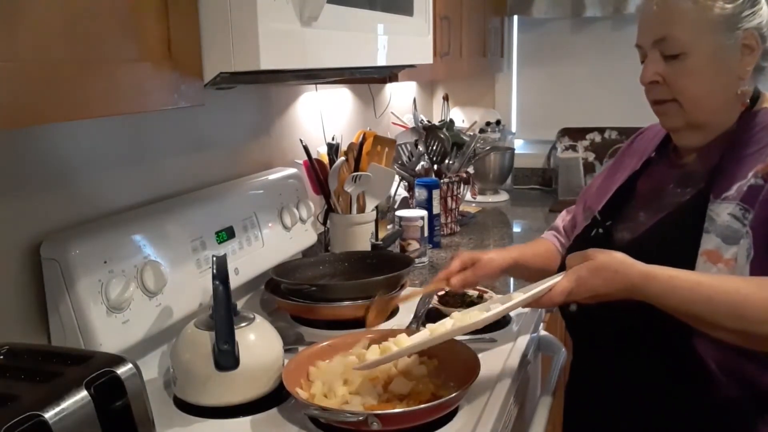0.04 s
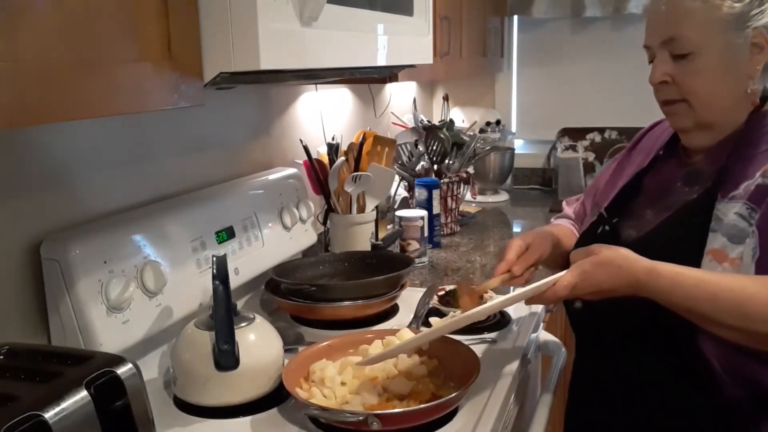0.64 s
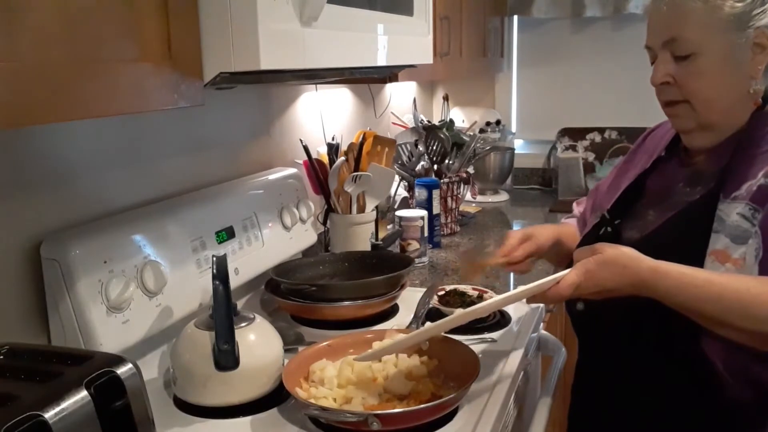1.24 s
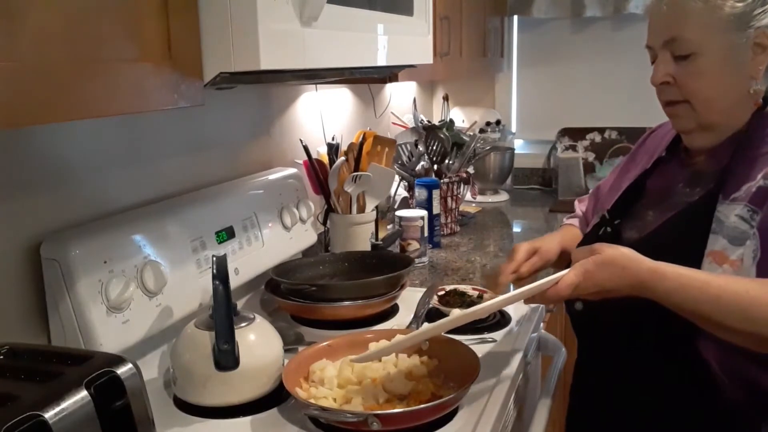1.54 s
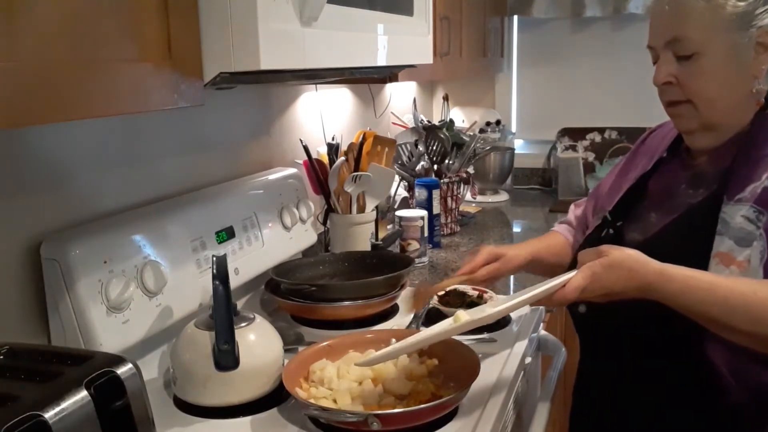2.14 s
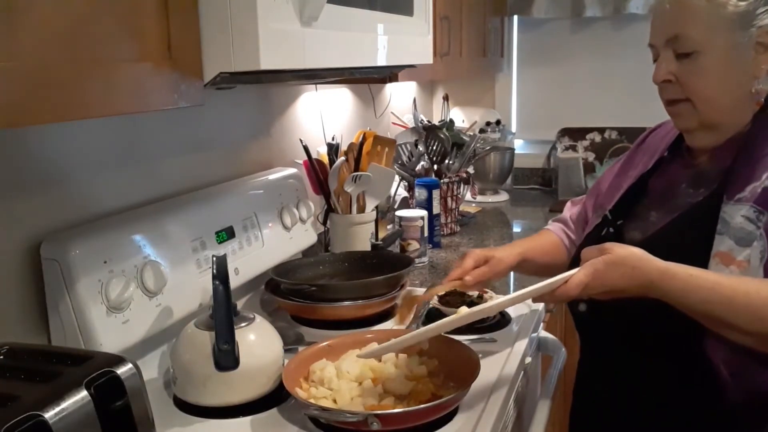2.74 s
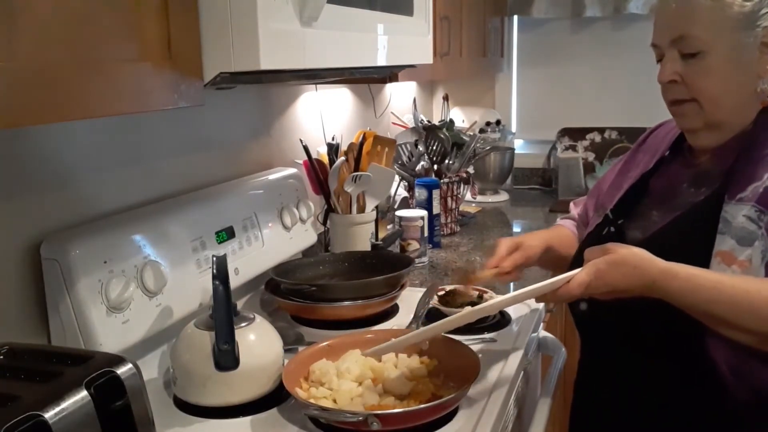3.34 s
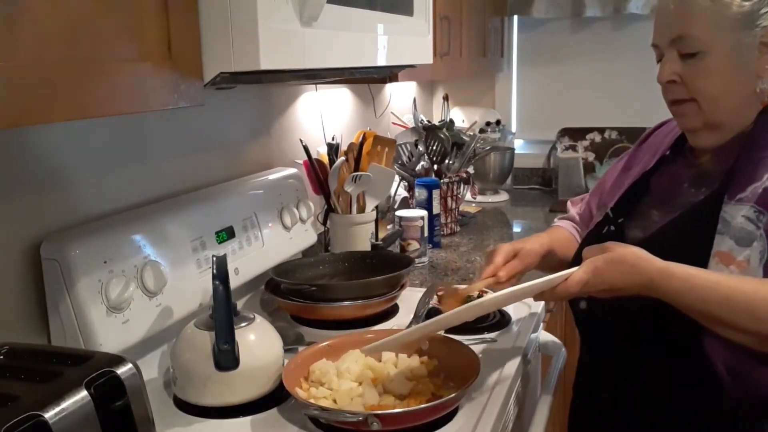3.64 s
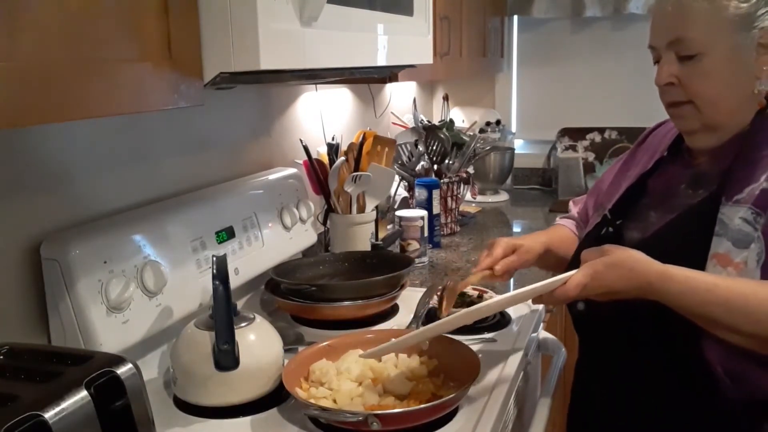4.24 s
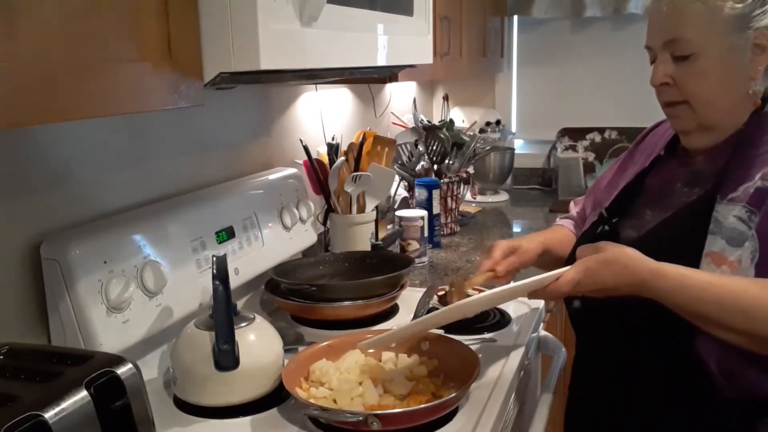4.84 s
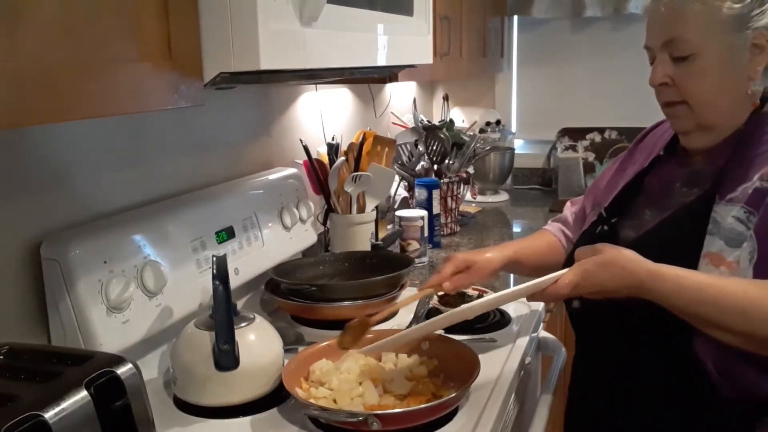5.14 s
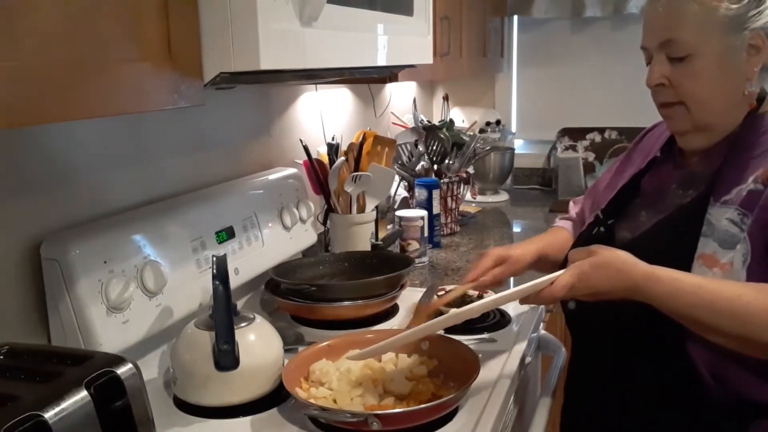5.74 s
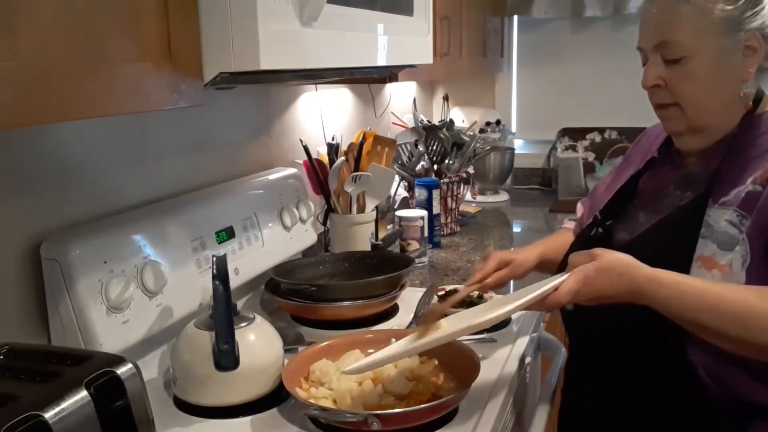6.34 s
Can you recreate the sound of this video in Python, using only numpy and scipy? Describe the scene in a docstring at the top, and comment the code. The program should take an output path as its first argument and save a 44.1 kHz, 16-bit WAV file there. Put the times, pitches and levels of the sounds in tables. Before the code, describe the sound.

Potatoes sizzle and crackle in a frying pan while a wooden spatula repeatedly knocks and scrapes on a cutting board.

```python
"""A steady, crackling sizzle: potatoes and vegetables fry in oil in a pan on a kitchen stove.
Water bursts from the food in tiny bubbles and the pan rings faintly, with sharp pops of oil and one
bright clack. A wooden spatula knocks on a cutting board held over the pan and scrapes food off it by
stick-slip friction; the first batch makes the oil surge. Oil and board reflect off a hard surface
3 ms later and reverberate in the small room. An appliance hums underneath."""
import sys
import numpy as np
from scipy import signal
from scipy.fft import rfft, irfft
from scipy.io import wavfile

SR = 44100
rng = np.random.default_rng(int(sys.argv[2]) if len(sys.argv) > 2 else 0)


def to_wav(s):
    """Save 16-bit WAV."""
    ch = np.atleast_2d(s).T  # columns
    pcm = np.round(np.clip(ch, -1, 1) * 32767)  # PCM
    wavfile.write(sys.argv[1], SR, pcm.astype(np.int16))


N = 291192
TIME = np.arange(N) / SR

# spectra of the oil's fine fizz and coarser spatter: (frequency [Hz], relative level [dB])
FIZZ_SPECTRUM = [(7500, -25.5), (8500, -19.5), (9400, -2), (10800, -1.5), (11900, 1), (13200, -4),
                 (15800, -8)]
SPATTER_SPECTRUM = [(250, -18), (500, -9), (700, -7.5), (1100, -6), (1500, -6), (1900, -4.5), (2600, -3.5),
                    (4700, 2), (6400, -1), (8400, 2.5), (9800, 4), (16000, -35)]
# sharp pops of oil and one bright clack: (time [s], source level [dB], spatter relative to fizz [dB])
POPS_AND_CLACK = [(0.5507, -25.5, -12), (2.887, -27, -14), (3.1185, -29.5, -16), (3.175, -27, -1),
                  (4.3303, -25, -10), (4.4504, -21, -2.5), (5.0391, -24.5, -7), (6.2903, -22, 8),
                  (6.414, -25.5, -12)]
# fat bubbles that ring the pan: (time [s], level [dB])
FAT_BUBBLES = [(2.251, -39), (3.803, -36), (5.155, -31.5), (6.228, -35)]
# spatula landings: (time [s], drive level [dB], contact cutoff [Hz], thump relative to drive [dB])
SPATULA_KNOCKS = [(.7646, -27, 950, -23), (1.426, -11.5, 1200, -17.5), (1.4712, -19.5, 1140, -17),
                  (1.626, -20, 960, -9.5), (1.9351, -25.5, 1350, -29), (2.3494, -5.5, 1300, -17),
                  (2.6033, -14.5, 1540, -27), (2.8479, -9.5, 1670, -22), (3.5113, -14, 1850, -19.5),
                  (4.3464, -12, 2130, -22), (4.8594, -8, 3720, -21), (5.5363, -10.5, 1560, -17),
                  (5.7131, -19.5, 1130, -12.5), (5.8111, -15.5, 1600, -23), (6.2545, -8.5, 1050, -20),
                  (6.3268, -23, 1250, -34), (6.3797, -18.3, 1360, -21)]
# spatula strokes along the board: (start [s], end [s], level [dB], friction cutoff [Hz])
SPATULA_STROKES = [(0.791, 0.87, -47.5, 1200), (1.486, 1.596, -39, 850), (1.647, 1.796, -45.5, 450),
                   (1.8, 1.888, -43, 1000), (2.46, 2.564, -38.5, 770), (2.875, 2.969, -39, 1200),
                   (3.562, 3.714, -38, 960), (4.385, 4.433, -41.5, 1100), (4.927, 5.061, -36, 1300),
                   (5.554, 5.676, -36.5, 1110), (5.686, 5.824, -35.5, 1270), (6.354, 6.406, -37.5, 1480)]
# spectra of the board's dead thud and of its low flexing thump: (frequency [Hz], relative level [dB])
THUD_SPECTRUM = [(90, -18), (170, -19), (270, -11), (380, -10), (620, 6.5), (850, 1), (1300, -0.5),
                 (2200, 1), (3500, -3.5), (6000, -26), (12000, -44)]
FLEX_SPECTRUM = [(60, -21), (130, -12), (180, -4.5), (290, 3), (400, 0), (900, -28.5), (4000, -83)]
# normal modes of the board: (frequency [Hz], relative level [dB], t60 [s])
BOARD_MODES = [(193, -36, 0.48), (270.4, -35.5, .35), (443.6, -24.5, 0.28), (594, -21.5, 0.11),
               (661, -25.5, 0.26), (693, -12.5, 0.064), (772, -29.5, 0.47), (761, -22, 0.16),
               (860, -16.5, 0.045), (989, -22.5, 0.28), (1060, -69, 0.1), (1109, -17.5, 0.11),
               (1205, -18, 0.14), (1362, -18.5, 0.13), (1360, -53, .13), (1663, -14.5, 0.053),
               (2240, -26, 0.25)]
# the board's direct sound and early reflections: (delay [s], left gain [ratio], right gain [ratio])
BOARD_PATHS = [(0, 0.63, 0.66), (.0031, 2, 1), (.0059, 0.27, 0.76), (.0098, -0.34, -0.2),
               (0.0109, 0.9, -0.38), (0.0169, 0.76, 0.46)]
# reverberation time of the kitchen: (frequency [Hz], t60 [s])
ROOM_DECAY = [(200, 0.24), (600, 0.24), (1500, 0.26), (4000, 0.19), (14000, 0.047)]
# partials of the motor hum: (frequency [Hz], level [dB])
HUM_PARTIALS = [(89.3, -63.5), (179, -65.5), (248, -60)]
# spectrum of the kitchen's rumble: (frequency [Hz], relative level [dB])
RUMBLE_SPECTRUM = [(20, -42), (33, -28), (45, 6), (60, 3), (75, -7), (140, 2), (270, 1.5), (380, -4),
                   (700, -4.5), (1500, -10), (4000, -43)]
# growth of hum, drone and rumble: (time [s], gain [dB])
BACKGROUND_RISE = [(0, -6), (1.2, -2), (2.2, -2.6), (5.5, 0)]

FIZZ_DB, SPATTER_DB = -33.5, -37.5  # before the surge
FOOD_S, SURGE_S, SURGE_DB, SETTLE_S = 0.77, 0.23, 2.5, 4.5  # onset, rise time, height, decay constant
SPATTER_SURGE_SHARE, FIZZ_WIDTH = .85, .42
PAN_HZ, PAN_UPPER_HZ, PAN_T60 = 2154, 2410, .06
GRIP_S, BRIGHTEN_DB = .018, 5  # a stroke's fade at each end, and its rise in treble
DRONE_HZ, DRONE_DB, WAVER_DEPTH, WAVER_HZ = 59.8, -61.5, 0.97, 1.9
ECHO_S = .0031  # reflection from the hard surface


def sizzle(patches=7):
    """Shot noise: water bursts in flurries of bubbles, each patch of pan with its own pitch and echo."""
    fizz, spatter = np.zeros((2, 2, N))
    flurry_db = .25 * drift(hz=22)
    pitches = np.geomspace(2500, 14500, patches)
    for hz, place in zip(pitches, rng.permutation(np.linspace(-1, 1, patches))):
        bubbles = signal.lfilter(*signal.iirpeak(hz, 2, SR), crackle(per_s=1500, spread_db=3.5, cap=6.2))
        snaps = crackle(per_s=380, spread_db=3.2, cap=5)  # the sharpest bursts cover all pitches
        bursts = (0.8 * unit_rms(bubbles) + unit_rms(snaps)) * gain_of(flurry_db + 1.54 * drift(hz=34.4))
        add(bursts, ECHO_S + .0005 * place, 0.48 * bursts)
        fizz += oil_path(bursts, FIZZ_SPECTRUM, wet=.7, width=FIZZ_WIDTH)
        spatter += oil_path(bursts, SPATTER_SPECTRUM, wet=1.09, width=1.124)
    fizz = unit_rms(fizz) * gain_of(FIZZ_DB + surge())
    spatter = unit_rms(spatter) * gain_of(SPATTER_DB + SPATTER_SURGE_SHARE * surge())
    return fizz * leftward(db=-1.0) + spatter * leftward(db=2.5)


def surge():
    """Exponential relaxation: fresh food quickly lifts the oil's level, in dB, which then settles."""
    age = np.maximum(TIME - FOOD_S, 0)
    return SURGE_DB * np.minimum(age / SURGE_S, 1) * np.exp(-np.maximum(age - SURGE_S, 0) / SETTLE_S)


def pops_and_clack():
    """Transients: sharp pops of oil and one bright clack, each a fast-decaying noise reflected once."""
    fine, coarse = np.zeros((2, N))
    t = TIME[:2048]
    onset = round(.005 * SR)  # the first 5 ms set the level
    for s, level_db, spatter_db in POPS_AND_CLACK:
        snap, body = rng.standard_normal((2, len(t)))
        snap = signal.lfilter(*signal.butter(2, 13500, fs=SR), snap)
        snap *= np.exp(-t / 0.00083) + 0.057 * np.exp(-t / 0.0053)
        body *= np.exp(-t / .0005) + .15 * np.exp(-t / .012)
        size = gain_of(level_db) / np.hypot(1, gain_of(spatter_db))
        for delay, gain in (0, .8), (ECHO_S, .65):
            add(fine, s + delay, gain * size * snap / snap[:onset].std())
            add(coarse, s + delay, gain * size * gain_of(spatter_db) * body / body[:onset].std())
    fizz = oil_path(fine, FIZZ_SPECTRUM, wet=1.0, width=FIZZ_WIDTH)
    return fizz + oil_path(coarse, SPATTER_SPECTRUM, wet=0.77, width=1)


def oil_path(bursts, spectrum, wet, width):
    """Linear filtering by the oil's spectrum and the room; width scales the stereo difference."""
    path = wet * room(delay=0.0022)
    path[:, 0] += 1  # direct sound
    mid = path.mean(0)
    path = convolve(mid + width * (path - mid), pulse(spectrum))
    return convolve(bursts, path / np.linalg.norm(path.mean(0)))


def pan_ring():
    """Resonance: small bubbles excite two modes of the pan; fat ones strike the lower mode alone."""
    t = TIME[:8000]
    lower = mode(PAN_HZ, PAN_T60, t)
    upper = mode(PAN_UPPER_HZ, PAN_T60, t)
    damped = (lower + 0.6 * upper) * np.exp(-t / 0.059)  # food lying on the metal damps it
    bubbles = crackle(per_s=700, spread_db=3.5, cap=1.7) * gain_of(2.0 * surge())
    ringing = gain_of(-54.0) * unit_rms(convolve(bubbles, damped))
    for s, level_db in FAT_BUBBLES:
        add(ringing, s, gain_of(level_db) * lower)
    return (ringing + 0.17 * convolve(ringing, room(delay=0.0093))) * leftward(db=3.5)


def knocks():
    """Impact: the spatula pushes, rebounds and flexes the board; softer contact gives a duller knock."""
    blows, flex = np.zeros((2, N))
    jitters = rng.uniform(-0.79, 1, len(SPATULA_KNOCKS))
    for (s, drive_db, cutoff_hz, thump_db), jitter in zip(SPATULA_KNOCKS, jitters):
        contact = signal.lfilter(*signal.butter(2, cutoff_hz, fs=SR), signal.unit_impulse(512))
        push = gain_of(drive_db) * contact
        add(blows, s, push)
        add(blows, s + 0.00037 + 0.0003 * jitter, -.45 * push)  # the blade springs off
        add(flex, s + ECHO_S, gain_of(drive_db + thump_db) * pulse(FLEX_SPECTRUM))
    clack = board(blows, ring_db=-4.5, wet=.75)
    thump = flex + 0.49 * convolve(flex, room(delay=0.0035)[0])
    return clack + thump * leftward(db=2.5)


def scrapes():
    """Stick-slip friction: wood on the board gives a run of tiny blows, brightening along each stroke."""
    slips = crackle(per_s=1500, spread_db=1.6, cap=3) * gain_of(1.4 * drift(hz=90))
    blows = np.zeros(N)
    for start, end, level_db, cutoff_hz in SPATULA_STROKES:
        t = TIME[:round((end - start) * SR)]
        rub = signal.lfilter(*signal.butter(2, cutoff_hz, fs=SR), slips[round(start * SR):][:len(t)])
        low = signal.lfilter(*signal.butter(1, cutoff_hz, fs=SR), rub)
        contact = np.minimum(np.minimum(t, t[-1] - t) / GRIP_S, 1)
        treble_gain = gain_of(BRIGHTEN_DB * t / t[-1])
        add(blows, start, gain_of(level_db) * unit_rms(contact * (low + treble_gain * (rub - low))))
    return unit_rms(board(blows, ring_db=-2.5, wet=0.94)) * blows.std()


def board(blows, ring_db, wet):
    """Impulse response: each blow gives ringing modes and a thud that near surfaces and room return."""
    t = TIME[:16000]
    thud = pulse(THUD_SPECTRUM)
    path = np.zeros((2, len(t)))
    for delay, left, right in BOARD_PATHS:
        add(path, delay, np.outer([left, right], thud))
    modes = sum((-1) ** k * gain_of(db) * mode(hz, t60, t) for k, (hz, db, t60) in enumerate(BOARD_MODES))
    add(path, .003, gain_of(ring_db) * modes * leftward(db=-2))
    tail = convolve(thud, room(delay=0.0044))
    # long waves reach both sides in phase
    side = signal.sosfilt(signal.butter(1, 750, "high", fs=SR, output="sos"), tail - tail.mean(0))
    add(path, 0, wet * (tail.mean(0) + 1.1 * side) * leftward(db=5))
    return convolve(blows, path)


def room(delay, spacing=4, size=16000):
    """Diffuse reverberation: random reflections, each band dying at its own rate; energy 1 a channel."""
    signs = rng.choice([-1., 1.], (2, size))
    taps = signs * (rng.random((2, size)) < 1 / spacing) * (TIME[:size] > delay)
    hz, t, bands = signal.stft(taps, SR, nperseg=256)
    decay = gain_of(-60 * t / curve_at(ROOM_DECAY, hz)[:, None])
    tail = signal.istft(bands * decay, SR, nperseg=256)[1]
    return tail / np.linalg.norm(tail, axis=1, keepdims=True)


def appliance():
    """Amplitude and phase modulation: a motor hum and a low drone waver over the kitchen's rumble."""
    hum = np.zeros(N)
    for hz, db in HUM_PARTIALS:
        phase = 2 * np.pi * hz * TIME + 0.7 * drift(hz=3.6)
        hum += gain_of(db + 2 * drift(hz=2.9)) * np.sqrt(2) * np.sin(phase)
    waver = 1 + WAVER_DEPTH * (drift(WAVER_HZ) + 1j * drift(WAVER_HZ))
    drone = gain_of(DRONE_DB) * unit_rms((waver * np.exp(2j * np.pi * DRONE_HZ * TIME)).real)
    air = rng.standard_normal(N) + 0.4 * rng.standard_normal((2, N))
    rumble = gain_of(-55.5) * unit_rms(convolve(air, pulse(RUMBLE_SPECTRUM, size=16384)))
    rise = gain_of(np.interp(TIME, *np.transpose(BACKGROUND_RISE)))
    return (drone + hum + rumble) * rise * leftward(db=5.0)


def mode(hz, t60, t):
    """Damped oscillation: a sine that falls 60 dB in t60 seconds."""
    return np.exp(-np.log(1000) * t / t60) * np.sin(2 * np.pi * hz * t)


def crackle(per_s, spread_db, cap):
    """Poisson process: random clicks, mostly small, spanning spread_db times cap decibels."""
    size = gain_of(spread_db * np.minimum(rng.exponential(1, N), cap))
    return size * rng.choice([-1, 1], N) * (rng.random(N) < per_s / SR)


def drift(hz):
    """Low-pass noise: a random fluctuation of rms 1, with rates up to about hz."""
    steps = rng.standard_normal(2048)
    rates = np.fft.rfftfreq(len(steps), TIME[-1] / len(steps))
    slow = irfft(rfft(steps) * np.exp(-(rates / hz) ** 2))
    return np.interp(TIME, np.linspace(0, TIME[-1], len(steps)), unit_rms(slow))


def pulse(spectrum, size=4096):
    """Minimum phase: the shortest causal pulse with this spectrum, peak 1."""
    hz = abs(np.fft.fftfreq(size, 1 / SR))
    log_gain = np.log(gain_of(curve_at(spectrum, hz)))
    wave = np.fft.ifft(np.exp(np.conj(signal.hilbert(log_gain)))).real[:size // 2]
    return wave / abs(wave).max()


def curve_at(points, hz):
    """Interpolation on a log-frequency axis."""
    f, value = np.transpose(points)
    return np.interp(np.log(hz + 1), np.log(f + 1), value)


def convolve(x, response):
    """Convolution with a response of one or two channels."""
    return signal.oaconvolve(np.atleast_2d(x), np.atleast_2d(response), axes=1)[:, :N]


def add(mix, s, sound):
    """Superposition of a sound on the mix at time s."""
    part = mix[..., max(round(s * SR), 0):][..., :sound.shape[-1]]
    part += sound[..., :part.shape[-1]]


def leftward(db):
    """Level difference: gains that favour the left channel by db."""
    return gain_of([[db / 2], [-db / 2]])


def gain_of(db):
    """Amplitude ratio from decibels."""
    return 10 ** (np.asarray(db) / 20)


def unit_rms(x):
    """Normalisation to rms 1."""
    return x / np.sqrt(np.mean(x ** 2) + 1e-20)


def scene():
    """Superposition: the pressures from oil, pan, board and appliance add."""
    return sizzle() + pops_and_clack() + pan_ring() + knocks() + scrapes() + appliance()


def record(dry):
    """Band limiting: the sound passes between 40 Hz and 15850 Hz."""
    low_cut = signal.sosfilt(signal.butter(4, 40, "high", fs=SR, output="sos"), dry)
    low_pass = signal.firwin(511, 15850, window=("kaiser", 9), fs=SR)
    return signal.oaconvolve(low_cut, low_pass[None], "same")


dry = scene()
out = record(dry)
to_wav(out)
```